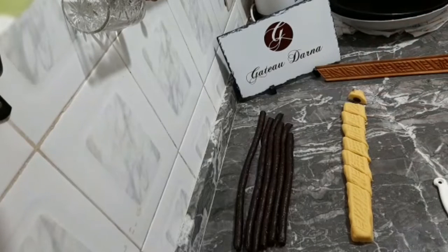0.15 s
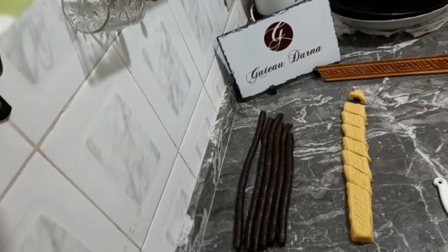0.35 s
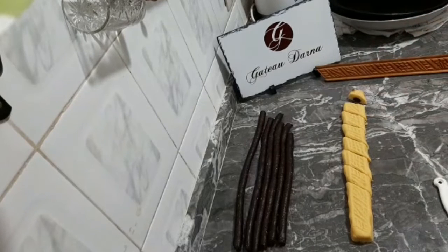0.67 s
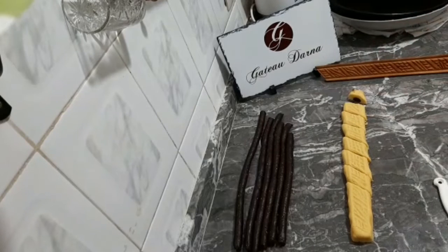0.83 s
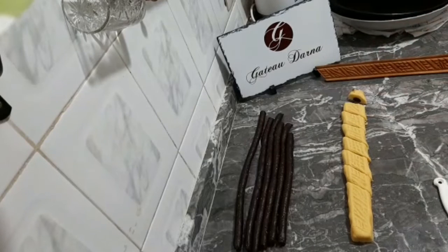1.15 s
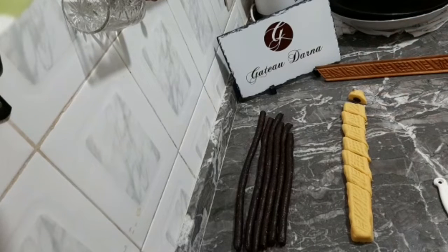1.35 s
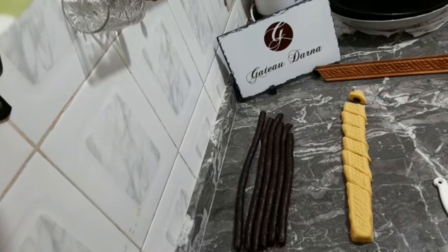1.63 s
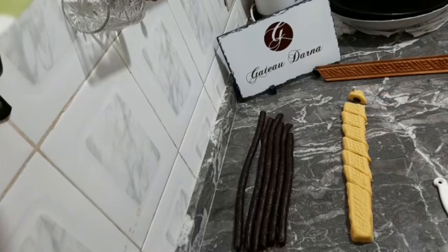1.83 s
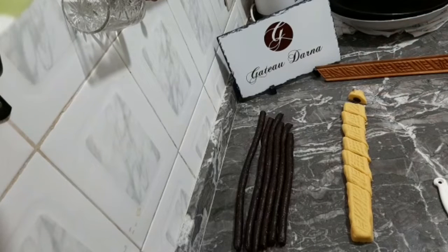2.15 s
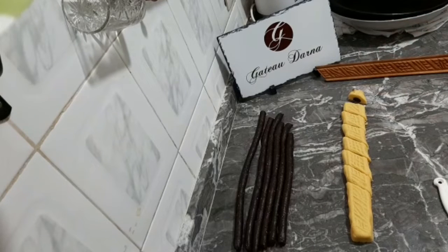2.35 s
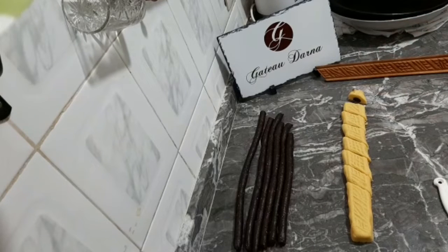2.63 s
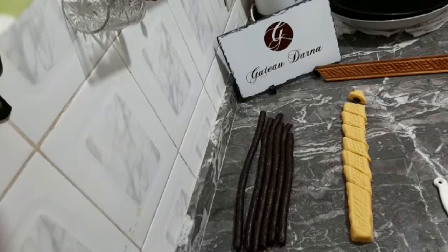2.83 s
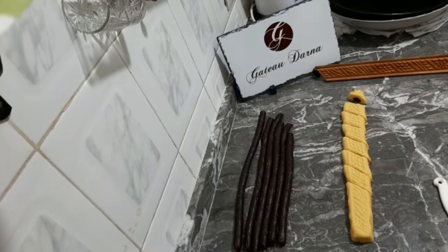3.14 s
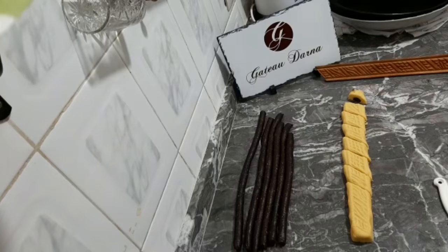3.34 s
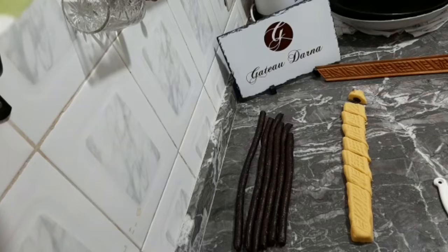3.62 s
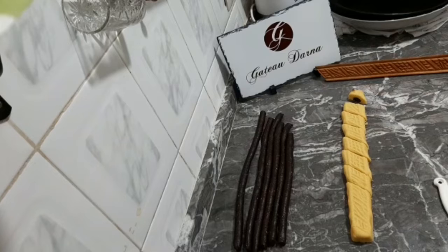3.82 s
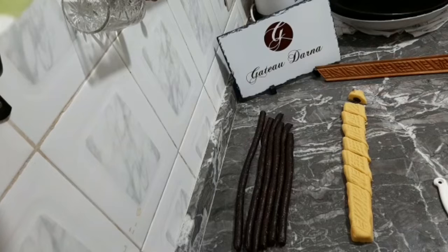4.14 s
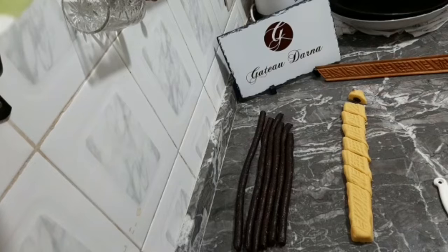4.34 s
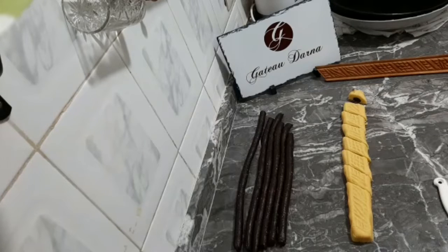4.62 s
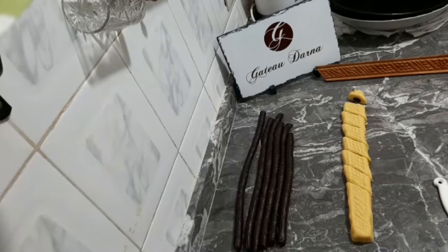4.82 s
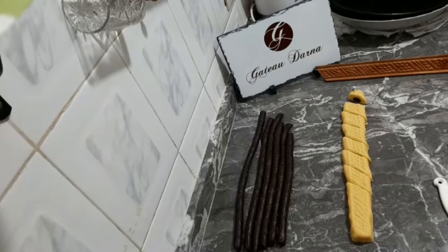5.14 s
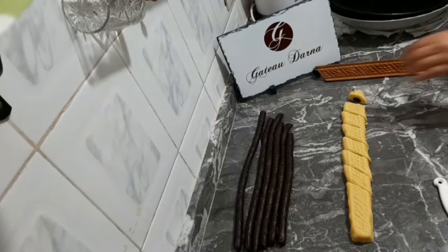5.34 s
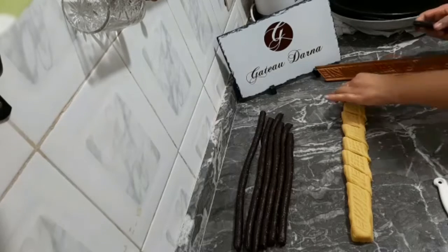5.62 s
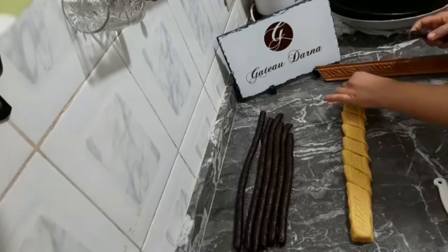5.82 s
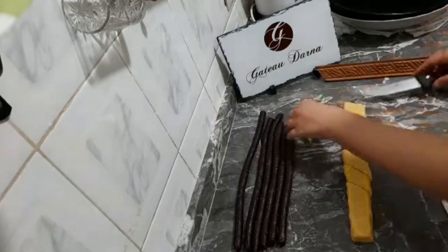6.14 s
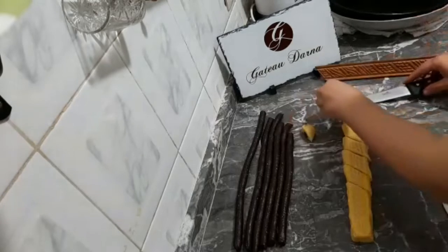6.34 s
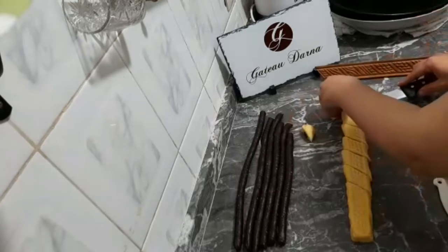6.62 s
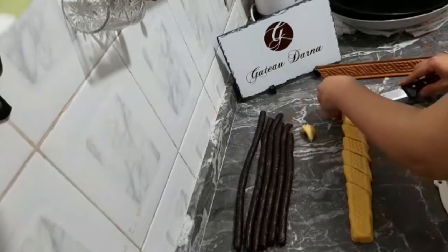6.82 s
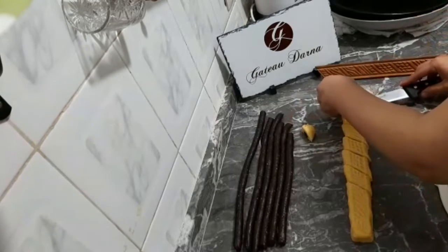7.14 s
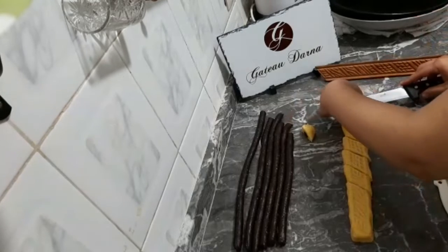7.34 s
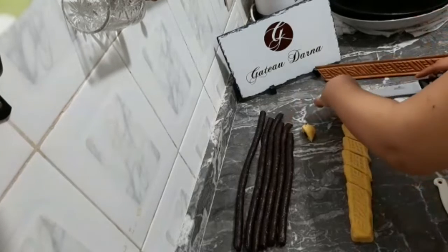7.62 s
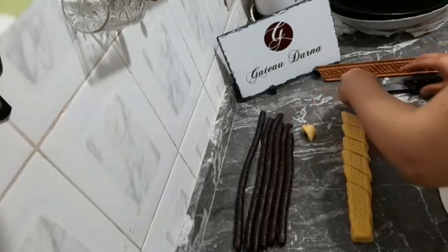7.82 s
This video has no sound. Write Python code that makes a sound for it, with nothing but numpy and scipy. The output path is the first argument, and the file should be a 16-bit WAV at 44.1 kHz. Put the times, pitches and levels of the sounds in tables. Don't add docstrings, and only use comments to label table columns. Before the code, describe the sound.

Quiet kitchen with faint hiss and soft sleeve rustling close by. A wooden drawer, to the left, rolls out with a low rumble and knocks hard at its stop, rattles while someone rummages, then slides home and slams with a deep boom. Afterwards only hand brushing and a few light, dry knife taps on the stone counter. A phone's stereo microphones catch the hard tiled room's short ring.

```python
import sys
import numpy as np
from scipy import signal
from scipy.fft import rfft, irfft
from scipy.io import wavfile

SR = 44100
rng = np.random.default_rng(int(sys.argv[2]) if len(sys.argv) > 2 else 0)


def unload_wav(signal):
    wavfile.write(
        sys.argv[1],
        SR,
        np.round(np.clip(np.atleast_2d(signal).T, -1, 1) * 32767).astype(np.int16),
    )


N = 351469


def gain_of(db):
    return 10 ** (np.asarray(db) / 20)


def unit(x):
    return x / np.sqrt(np.mean(np.sum(np.atleast_2d(x) ** 2, -1)))


def read(points, hz):
    f, value = np.transpose(points)
    return np.interp(np.log(hz + 1), np.log(f + 1), value)


def add(mix, s, sound):
    part = mix[..., round(s * SR):][..., :sound.shape[-1]]
    part += sound[..., :part.shape[-1]]


def through(x, response):
    return signal.fftconvolve(x[None], response, axes=1)[:, :N]


def butter(x, order, hz, kind="low"):
    return signal.sosfilt(signal.butter(order, hz, kind, fs=SR, output="sos"), x)


def colour(x, spectrum):
    hz = np.linspace(0, SR / 2, 1025)
    response = signal.firwin2(767, hz, gain_of(read(spectrum, hz)), fs=SR)
    return signal.oaconvolve(x, unit(response), "same")


def ring(modes, build, skew):
    hz, db, t60, side_db = np.transpose(modes)[:, :, None]
    t = np.arange(SR) / SR
    lag = skew * rng.standard_normal(hz.shape)
    body = gain_of(db - 60 * t / t60) * (1 - np.exp(-t / build))
    ports = []
    for side in (1, -1):
        tones = np.sin(2 * np.pi * hz * t + side * lag)
        ports.append((body * gain_of(side * side_db / 2) * tones).sum(0))
    return unit(np.array(ports))


def contacts(per_s, spread_db, fuzz):
    size = gain_of(spread_db * np.minimum(rng.exponential(1, N), 4))
    ticks = size * (rng.random(N) < per_s / SR) * rng.choice([-1., 1.], N)
    x = ticks / ticks.std() + fuzz * rng.standard_normal(N)
    return x / x.std()


def strokes(rows, shape):
    edge_s = 0.018
    share, rise_db, sag_db = shape
    t, power = np.arange(N) / SR, np.zeros((len(rows[0]) - 2, N))
    for s, length, *levels_db in rows:
        at = s + np.array([-edge_s, 0, share * length, length, length + edge_s])
        span = slice(*np.searchsorted(t, at[[0, -1]]))
        swell = gain_of(np.interp(t[span], at, [-60, -rise_db, 0, -sag_db, -60]))
        power[:, span] += (gain_of(levels_db)[:, None] * swell) ** 2
    return power


# start in seconds, length in seconds, rattle in dB,
# carcass boom over it in dB, panels over it in dB.
SLIDES = [
    (1.6, 0.96, -47, -3.5, -5.5),
    (1.86, 0.28, -46.5, -1.5, -2),
    (2.02, 0.22, -44, 4, -3.5),
    (2.18, 0.41, -53.5, 10, -2.5),
    (3.04, 0.32, -46.5, -24, -7),
    (4.2, 0.66, -41.5, -1, 1.5),
    (4.54, 0.044, -35.5, 14, 5.5),
]
JOLTS = [(1.505, 0.07, -37, -2, -7.5), (2.335, 0.13, -33.5, 6.5, -2.5), (2.42, 0.054, -40, -10, 10),
         (2.7, 0.25, -68.5, 24, 13), (2.81, 0.28, -38, -0.5, -2.5), (2.91, 0.18, -33.5, 8, 2),
         (3.3, 0.38, -58, 8.5, 8), (3.74, 0.064, -65.5, -5.5, 23.5), (3.775, 0.48, -53.5, 0.5, 1),
         (3.935, 0.19, -37.5, 0.5, 10), (4.055, 0.13, -35.5, -5, 10), (4.39, 0.084, -36, 8, 2.5),
         (4.425, 0.12, -31, 13.5, 12.5)]
# start in seconds, length in seconds, boom in dB.
SHUDDERS = [
    (2.452, 0.17, -30),
    (4.731, 0.33, -23.5),
    (4.95, 0.077, -43),
    (5.095, 0.25, -54.5),
]
# share of the length spent rising, dB below the top at the start, dB below at the end.
SLIDE_SHAPE = (0.28, 2.5, 11.6)
JOLT_SHAPE = (0.31, 8.8, 21.3)
SHUDDER_SHAPE = (0.45, 3.6, 20)


def drawer():
    slide_scrape_db, jolt_scrape_db = -7, -9.5
    grain = contacts(300, 3.2, 0.56)
    layers_db = np.array([0, -18, -31, -31 + jolt_scrape_db])
    rows = [(s, length, *(db + layers_db)) for s, length, db in SHUDDERS]
    shudder = np.sqrt(strokes(rows, SHUDDER_SHAPE)) * grain
    shudder[0] = butter(shudder[0], 4, 113)
    power = 0
    for table, shape, scrape_db in (SLIDES, SLIDE_SHAPE, slide_scrape_db), (JOLTS, JOLT_SHAPE, jolt_scrape_db):
        rows = [(s, n, db + boom, db + panel, db, db + scrape_db) for s, n, db, boom, panel in table]
        power = power + strokes(rows, shape)
    return np.sqrt(power) * grain + shudder


HANGING_FROM_S, CLOSING_FROM_S, SLAM_FROM_S, QUIET_FROM_S = 3.7, 4.36, 4.7, 5.3


def chatter(length):
    u = np.arange(4096) / SR / max(length, .001)
    size = abs(rng.standard_normal(4096)) * (rng.random(4096) < .25) * u * np.exp(1 - u)
    size[0] = 1.3
    x = size * rng.choice([-1., 1.], 4096)
    for _ in range(8):
        spectrum = rfft(x)
        x = size * np.sign(irfft(spectrum / (abs(spectrum) + 1e-9)))
    return unit(x) * np.sqrt(SR * 0.013)


# time in seconds, then panel, boom, rattle and crack in dB.
KNOCKS = [(1.495, -52, -62.5, -57.5, -55.5), (1.531, -37.5, -47, -33, -46), (1.544, -27, -32, -30.5, -41),
          (1.573, -33, -48.5, -51, -54), (2.045, -43, -55.5, -41, -57), (2.226, -42, -55, -53, -58),
          (2.323, -30, -35.5, -27, -51), (2.329, -10, -14.5, -16.5, -35.5), (2.341, -6, -24.5, -22, -40.5),
          (2.35, -15, -22, -28, -49), (2.372, -14.5, -10.5, -29, -45), (2.912, -18, -52, -34, -59),
          (2.94, -32, -19.5, -47, -56), (3.359, -64, -36, -46, -59), (3.385, -47, -39.5, -56, -79),
          (3.778, -34.5, -67, -59, -55), (3.943, -24, -63.5, -34.5, -41.5), (3.966, -18, -42, -44, -53),
          (3.985, -27.5, -45, -32, -68.5), (4.057, -13, -29, -19.5, -32.5), (4.072, -14, -42.5, -30, -35.5),
          (4.125, -22.5, -39.5, -34.5, -54.5), (4.392, -25, -27.5, -59.5, -46.5),
          (4.445, -22.5, -36, -33.5, -47), (4.471, -19, -28, -24.5, -38.5), (4.502, -23, -35, -27, -54.5),
          (4.575, -42, -20.5, -28.5, -52), (4.719, -10.5, -19, -27, -42.5), (4.728, -5, -6.5, -19.5, -47),
          (4.755, -14.5, -9, -35.5, -59), (4.745, -24.5, -10, -33, -64.5)]
BUMPS = [
    (0.184, -43, -80, -52, -92),
    (0.594, -60, -68, -60, -69),
    (0.693, -44.5, -60, -49.5, -102),
    (5.44, -53, -93, -55.5, -157),
    (5.679, -57, -69, -74, -56),
    (5.949, -71, -87, -58.5, -79),
    (6.034, -51, -74, -53, -73),
    (6.283, -80, -81, -62, -69),
    (6.989, -65.5, -87.5, -91, -85.5),
    (7.847, -47, -84, -43, -77),
]


def knocks(rows, chatter_s):
    drive = np.zeros((4, N))
    for s, panel_db, boom_db, rattle_db, crack_db in rows:
        length = 0.008 if HANGING_FROM_S < s < CLOSING_FROM_S else chatter_s
        add(drive[0], s + 1.8 * length, gain_of([boom_db + 30.0]))
        add(drive[1], s + 0.74 * length, gain_of([panel_db + 18.5]))
        add(drive[1:], s, gain_of([[panel_db - 20.5], [rattle_db], [crack_db]]) * chatter(length))
    return drive


# frequency in Hz, level in dB, t60 in seconds, left over right in dB.
CARCASS = [(51.7, -16, 0.047, 7), (72.3, -13.5, 0.53, -0.5), (80.05, -7, 0.75, 6), (82.8, -17, 0.41, 2),
           (97.5, -0.5, 0.49, 8), (104, -4, 0.23, 6.5), (131.5, -5.5, 0.51, -1), (145.05, -3.5, 0.38, 6),
           (181.3, -20.5, 0.47, 8.5)]
# from time in seconds, then side walls,
# floor and back in dB.
WALLS = [
    (0, -5.5, -18.5, -2),
    (2.3, -5, -13, -6),
    (2.75, -16, -32, -1.5),
    (3.3, -7.5, -25, -2.5),
    (3.9, -2.5, -29, -2.5),
    (4.36, -6.5, -28, -2.5),
    (4.699, -14, -14.5, -2.5),
]


def carcass(x):
    start, *db = np.transpose(WALLS)
    position = np.searchsorted(start, np.arange(N) / SR, "right") - 1
    walls, floor, back = x * gain_of(np.array(db)[:, position])
    out = through(floor, ring(CARCASS[:1], 0.012, 1 / 8))
    out += gain_of(-8.0) * through(x, ring(CARCASS[1:4], 0.0043, 1 / 8))
    out += through(back, ring(CARCASS[4:6], 0.0057, 1 / 8))
    return out + through(walls, ring(CARCASS[6:], 0.0042, 1 / 8))


# frequency in Hz, level in dB, t60 in seconds, left over right in dB.
PANELS = [(215, -10.5, 0.095, 5), (237, 1.5, 0.13, 0.5), (291.6, -5, 0.12, 3.5), (300, 1.5, 0.076, -4),
          (318, -5.5, 0.42, -1.5), (374.6, -6, 0.59, -5), (407.4, 5, 0.11, -3), (465, -0.5, 0.17, 0.5),
          (476, -3.5, 0.089, 0.5), (519, -0.5, 0.2, 3), (623.8, -5, 0.23, 4), (645, -9, 0.18, -3.5),
          (647, -13.5, 0.18, 11.5)]
# frequency in Hz, level in dB,
# t60 in seconds.
HANGING = [(237, -13, 0.073), (310, -1, 0.23), (360.2, 0, 0.39), (419, -0.5, 0.14), (476, -3.5, 0.146),
           (540, 1, 0.233), (602, -4.5, 0.35), (668, -5, 0.2), (716, -4, 0.14), (833, -1, 0.094)]
CLOSING = [(237, 1, 0.17), (270, -8.5, 0.16), (305.3, -2, 0.49), (377, -3.5, 0.22), (406.4, -7.5, 0.17),
           (465, -3, 0.17), (540, -23, 0.11), (594, -7.5, .2), (681, -15, 0.1)]


def panels(x):
    t = np.arange(N) / SR
    out = (t > HANGING_FROM_S) & (t <= CLOSING_FROM_S)
    home = (t > CLOSING_FROM_S) & (t <= QUIET_FROM_S)
    unslammed = (t <= SLAM_FROM_S) | (t > QUIET_FROM_S)
    hanging = [(hz, db, np.clip(t60, .05, .4), 1.5) for hz, db, t60 in HANGING]
    closing = [(hz, db, np.clip(t60, .05, .4), 3.5) for hz, db, t60 in CLOSING]
    positions = (~out & ~home, PANELS), (out, hanging), (home, closing)
    return sum(through(x * when * unslammed, ring(modes, 0.0039, 1 / 3)) for when, modes in positions)


# frequency in Hz, level in dB, t60 in seconds,
# left over right in dB.
SLAMMED = [(190, -10.5, .15, 5), (240, 0.5, 0.12, 2), (300.3, -7.5, 0.33, 1), (333.6, -13, 0.33, 1),
           (372.4, 1.5, .3, 0), (418, -7, .2, 2), (473, 1.5, 0.17, -2), (523.4, -11, 0.18, 0),
           (600, -19, .15, -1), (700, -23, .12, 3)]


def slam(x):
    t = np.arange(N) / SR
    shut = (t > SLAM_FROM_S) & (t <= QUIET_FROM_S)
    return through(x * shut, ring(SLAMMED, 0.0049, 1 / 3))


# start in seconds, length in seconds,
# frequency in Hz, bandwidth in Hz, level in dB.
SQUEAKS = [(0, 0.0094, 11750, 5900, -35), (0.841, 0.23, 1937, 700, -65), (1.149, 0.069, 1890, 200, -64),
           (0, 0.064, 3800, 1500, -64), (0.601, 0.067, 1406, 890, -64), (3.971, 0.061, 1138, 500, -35.5),
           (2.328, 0.045, 1992, 497, -27), (4.067, 0.056, 2467, 1500, -42),
           (4.72, 0.024, 3800, 2000, -34.5), (6.044, 0.065, 1910, 900, -78), (6.48, .02, 1420, 692, -58),
           (1.712, 0.11, 10060, 1500, -55.5), (1.82, 0.045, 12300, 1490, -58),
           (2.042, 0.073, 1507, 200, -47.5), (2.738, 0.078, 3914, 498, -72.5),
           (2.82, 0.066, 7300, 150, -67), (3.653, 0.056, 904, 700, -68.5), (3.745, 0.11, 1100, 500, -56),
           (3.783, 0.091, 5180, 1200, -64), (4.447, 0.045, 14900, 497, -48), (4.45, 0.048, 11370, 716, -48),
           (5.139, 0.061, 2226, 805, -63), (5.68, 0.0066, 4350, 1200, -40.5),
           (6.042, 0.034, 1097, 694, -59), (6.478, 0.0053, 6190, 506, -39.5),
           (6.479, 0.015, 3500, 200, -61), (6.283, 0.096, 3500, 4000, -63),
           (6.498, 0.065, 2190, 1200, -56.5), (7.115, 0.016, 9170, 2000, -42.5),
           (7.113, 0.0075, 12300, 3500, -43.5), (1.538, 0.049, 3500, 2497, -47.5),
           (2.339, 0.036, 1054, 350.6, -34), (6.79, 0.11, 6170, 900, -81.5),
           (6.977, 0.076, 9500, 6970, -67.5), (7.249, 0.092, 12430, 7000, -67),
           (7.454, 0.091, 12340, 6900, -66), (7.845, 0.037, 3400, 2600, -47), (7.85, 0.022, 1335, 150, -56),
           (7.846, 0.025, 834, 149.6, -56)]
# start
# in seconds, length in seconds, frequency in Hz, level in dB.
RINGS = [(0.165, 0.093, 323.3, -59), (0.69, 0.058, 152, -63.5), (1.524, 0.05, 149, -46),
         (2.329, 0.012, 198, -21), (2.333, 0.07, 472.6, -23.5), (2.902, 0.044, 246, -32),
         (3.36, 0.028, 255, -58), (4.392, 0.03, 322, -26.5), (4.47, 0.1, 545, -30.5),
         (4.541, 0.12, 266, -33.5), (4.723, 0.042, 237, -27.5), (0.149, 0.14, 296.7, -61.5),
         (1.54, 0.043, 488, -40), (1.565, 0.034, 749, -41), (2.086, 0.045, 310, -40),
         (2.225, 0.025, 502, -41), (2.42, 0.055, 469, -32.5), (4.392, 0.037, 192, -34.5),
         (5.445, 0.04, 498, -60.5), (5.635, 0.028, 478, -64.5), (6.5, 0.14, 545, -71), (6.62, .2, 530, -71),
         (2.903, 0.049, 420, -36), (2.89, 0.11, 578, -34.5), (2.995, 0.072, 588, -41),
         (3.775, 0.054, 337, -49), (3.784, 0.058, 536, -52), (7.12, 0.087, 336, -66.5),
         (7.43, 0.095, 519, -70), (7.86, 0.064, 485, -58), (6.029, 0.032, 540, -65),
         (6.46, 0.095, 140, -69.5), (6.757, 0.06, 300, -70), (7.692, 0.13, 288, -73)]


def squeaks():
    ring_hz = 25
    out = np.zeros(N)
    for s, length, hz, width, db in SQUEAKS + [(s, n, hz, ring_hz, db) for s, n, hz, db in RINGS]:
        t = np.arange(0, length, 1 / SR)
        r = np.exp(-np.pi * width / SR)
        noise = rng.standard_normal((SR, 2)) @ [1, 1j]
        wobble = signal.lfilter([1 - r], np.convolve([1, -r], [1, -r]), noise)[-len(t):]
        if width == ring_hz:
            wobble = wobble / abs(wobble) ** .75
        tone = (wobble * np.exp(2j * np.pi * hz * t)).real
        add(out, s, gain_of(db) * tone / tone.std() * signal.windows.tukey(len(t), .3))
    return out


# time in seconds, then blade ring, thud and click in dB, hardness from 0 to 1.
TAPS = [
    (6.4791, -43, -69, -35.5, 0.7),
    (7.1127, -37, -55, -33.5, 0.77),
    (7.4053, -32.5, -57, -32.5, 1),
    (7.8474, -45, -51, -71, 0),
]
# frequency in Hz, level in dB, t60 in seconds.
BLADE = [(1266, -2, 0.0068), (1539, -9, 0.018), (2600, -19, 0.0026), (2710, 0.5, 0.01), (3500, -7.5, 0.019),
         (4330, -6.5, 0.015), (4800, 1, 0.0093), (6480, 6.5, 0.011), (7390, 2.5, 0.01), (7850, -6, 0.012),
         (9000, -7, 0.0084), (9400, -10, 0.019), (11500, -6, 0.0087), (14000, -5, 0.008)]


def knife():
    blade, counter, t = np.zeros(N), np.zeros((2, N)), np.arange(1500) / SR
    hz, db, t60 = np.transpose(BLADE)[:, :, None]
    sign = (-1.) ** np.arange(len(BLADE))[:, None]
    for s, ring_db, thud_db, click_db, hard in TAPS:
        tilt_db = 12 * (hard - 1) * np.log2(np.maximum(hz, 2500) / 2500)
        grip = 1 + 0.018 * rng.standard_normal(hz.shape)
        decay = gain_of(db + tilt_db - 60 * t / t60)
        modes = (sign * decay * np.sin(2 * np.pi * hz * grip * t)).sum(0)
        modes = butter(modes, 4, min(4200 * 4 ** hard, 20000))
        add(blade, s, gain_of(ring_db - 5.0) * np.sqrt(SR * 0.027) * unit(modes))
        add(counter, s, gain_of([[thud_db], [click_db - 8.0]]) * chatter(0.0039))
    return blade, counter


# start in seconds, length in seconds, swish in dB,
# brushing over it in dB.
SWEEPS = [(-.05, 0.19, -50.5, 2.5), (0.15, 0.21, -57, -4.5), (0.54, 0.76, -70.5, 10.5),
          (0.74, 0.57, -56.5, -13), (1.021, 0.14, -42, -13), (1.143, 0.18, -63.5, -29),
          (1.333, 0.24, -86.5, 14.5), (5.025, 0.088, -59, 4.5), (5.125, 0.093, -51.5, -32),
          (5.434, 0.23, -44, -9.5), (5.629, 0.2, -47, -14.5), (5.8, 0.35, -67.5, -10),
          (6.02, 0.07, -58, 3.5), (6.272, 0.2, -58.5, -6), (6.475, 0.095, -50.5, -10),
          (6.954, 0.1, -82.5, -35), (7.127, 0.11, -47.5, -43), (7.423, 0.11, -69, -11.5),
          (7.853, 0.084, -63.5, 19)]
# start in seconds, length in seconds,
# level in dB, # 0 for low to 1 for high air modes, footfall over it in dB.
STIRS = [(-.03, 0.058, -34.5, 0.69, -13), (0.025, 0.19, -51.5, 0.24, -27), (0.538, 0.41, -64.5, 0.46, -7),
         (0.82, 0.34, -62, 0.63, -1), (1.088, 0.89, -68.5, 0.52, -7), (3.673, 0.19, -53, 0.74, -4),
         (5.378, 0.15, -74.5, 0.28, 13), (5.526, 0.35, -65, 0.53, -9), (5.846, 0.39, -73.5, 0.57, -4),
         (6.415, 0.37, -63, 0.82, -15), (6.666, 0.26, -66, .25, -8), (7.019, 0.17, -67, 0.58, -3),
         (7.343, 0.29, -69, 0.74, -29), (7.645, 0.63, -66.5, 0.18, -21)]
# share of the length spent rising, dB below the top at the start, dB below at the end.
SWEEP_SHAPE = (0.25, 13.2, 23)
STIR_SHAPE = (0.3, 12.5, 11)


def hands():
    idle_body_db, idle_arms_db = [[-81], [-84], [-84]], [[-84.5], [-95.5]]
    body = strokes([(s, n, db + step, db, db) for s, n, db, high, step in STIRS], STIR_SHAPE)
    middles = [(s + n / 2, high) for s, n, db, high, step in STIRS]
    turn = np.interp(np.arange(N) / SR, *np.transpose(middles)) * np.pi / 2
    body = (body + gain_of(idle_body_db) ** 2) * [np.ones(N), np.cos(turn) ** 2, np.sin(turn) ** 2]
    arms = strokes([(s, n, db + brush, db) for s, n, db, brush in SWEEPS], SWEEP_SHAPE)
    arms = arms + gain_of(idle_arms_db) ** 2
    return np.sqrt(np.vstack([body, arms])) * contacts(2600, 6.4, 0.99)


# frequency in Hz, level in dB, t60 in seconds, left over right in dB.
AIR = [(152.2, -9.5, 0.25, 0), (297.7, 5.5, 0.057, 6.5), (308, -4.5, 0.53, -8), (392, -7, 0.25, -1.5),
       (465, -16.5, 0.8, -8.5), (521, -2.5, 0.24, 4.5), (577, -9, 0.22, 9.5), (644, -9, 0.15, 12.5),
       (758, -19, 0.37, 14)]


def air(low, high):
    return through(low, ring(AIR[:3], 0.007, 1 / 4)) + through(high, ring(AIR[3:], 0.006, 0.3))


# frequency in Hz, likeness of left and right from -1 to 1.
LIKENESS = [(200, 0.42), (640, 0.44), (1400, -0.21), (3000, 0.014)]


def far_port(hz, left, other):
    same = np.clip(read(LIKENESS, hz), -1, 1)
    return same * left + np.sqrt(1 - same ** 2) * other


# frequency in Hz, left over right in dB.
LEFT_DB = [(60, -0.5), (180, 6), (550, 3.5), (1650, 1), (4970, 1.5), (15000, -2)]


def field(frames, magnitude):
    hz, t = np.fft.rfftfreq(256, 1 / SR)[:, None], np.arange(frames) * 64 / SR
    a, b, c, d = rng.standard_normal((frames, 129, 4)).T
    left, side = a + 1j * b, gain_of(read(LEFT_DB, hz) / 2)
    z = np.array([left * side, far_port(hz, left, c + 1j * d) / side])
    return signal.istft(z * magnitude(hz, t), nperseg=256, noverlap=192)[1]


# frequency in Hz, t60 in seconds.
KITCHEN = [(300, 0.42), (1100, 0.44), (2900, 0.43), (7700, 0.36), (14000, 0.36)]


def kitchen():
    tail = field(560, lambda hz, t: gain_of(-60 * t / read(KITCHEN, hz)))
    t = np.arange(tail.shape[1]) / SR
    level = read(KITCHEN, np.fft.rfftfreq(len(t), 1 / SR)) ** -.5
    tail = tail * (1 - np.exp(-t / 0.011) + 2.26 * np.exp(-t / 0.0035))
    return unit(irfft(rfft(tail) * level, len(t)))


TURN_PER_S = [11, 29, 41]


def room(x):
    a, b, c = np.arange(N) / SR * np.array(TURN_PER_S)[:, None]
    shares = np.cos(a) * np.cos(b), np.cos(a) * np.sin(b), np.sin(a) * np.cos(c), np.sin(a) * np.sin(c)
    return sum(through(x * share, kitchen()) for share in shares)


# frequency in Hz, level in dB per Hz.
QUIET = [(14, -40.5), (24, -6.5), (75, -5), (180, -10.5), (285, -7), (847, -25.5), (945, -27.5),
         (13600, -28), (16000, -38.5)]


def quiet():
    hz = np.fft.rfftfreq(N, 1 / SR)
    left, other = rfft(rng.standard_normal((N, 2)).T)
    x = irfft(np.array([left, far_port(hz, left, other)]) * gain_of(read(QUIET, hz)), N)
    return gain_of(-80 + 4.0) * x / x.std()


# frequency in Hz, level in dB per Hz.
THUD = [(150, -18.5), (250, 5.5), (600, 2.5), (900, -41)]
RATTLE = [(350, -11.5), (600, -16), (664, -8), (760, -6), (1140, -6.5), (1500, -9), (2040, -12),
          (3900, -28), (4500, -28), (5850, -48.5), (9900, -120)]
SCRAPE = [(1760, -16), (2600, -4.5), (4660, -6), (8230, -11.5), (9730, -11), (14900, -22), (16000, -16)]
CRACK = [(1760, -18.5), (3000, -9), (3570, -4.5), (5630, -9.5), (14800, -20.5), (16000, -25.5)]
BRUSH = [(350, -39), (600, 1), (704, 13), (892, 10), (1390, 11.5), (1830, 12.5), (4500, -15), (5850, -54),
         (9900, -120)]
SWISH = [(1760, -5.5), (3000, 4), (4570, 1.5), (4970, 2), (7670, -2), (12300, -3.5), (16000, -12)]


def scene():
    boom, panel, rattle, scrape = drawer()
    push, blow, clatter, crack = knocks(KNOCKS, 0.0045)
    nudge, bump, tick, snap = knocks(BUMPS, 0.0019)
    blade, (thud, click) = knife()
    blade = butter(blade + colour(click, SWISH), 2, 1000, "high")
    steps, low, high, brush, swish = hands()
    squeak = squeaks()
    hum = signal.sosfiltfilt(signal.butter(2, 750, fs=SR, output="sos"), squeak)

    struck = panel + blow + bump
    modes = carcass(boom + steps + push + nudge) + air(low, high)
    modes += butter(panels(struck) + slam(struck), 2, 140, "high")
    modes += gain_of([[-4 + 1.5], [-4 - 3.0]]) * colour(blow, THUD)

    wood = gain_of(-4.0) * colour(panel + blow + 1.9 * bump + 2.0 * thud + 0.58 * (low + high), THUD)
    wood += colour(rattle + clatter, RATTLE)
    fine = colour(scrape, SCRAPE) + colour(crack + snap, CRACK)
    fine += colour(brush + tick, BRUSH) + colour(swish, SWISH)
    near = gain_of([[-2], [-4]]) * hum + gain_of(-6.0) * squeak
    return modes + near + room(wood + fine + blade + squeak - 0.59 * hum) + quiet()


def low_pass(x):
    return signal.sosfilt(signal.butter(12, 16620, fs=SR, output="sos"), x)


def record(dry):
    limit = 1.5
    ports = butter(dry, 2, 48, "high")
    ports = limit * np.tanh(ports / limit)
    top = signal.firwin(255, 15850, fs=SR)
    return low_pass(signal.oaconvolve(ports, top[None], "same"))


dry = scene()
out = record(dry)
unload_wav(out)
```